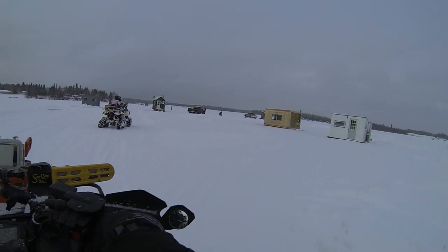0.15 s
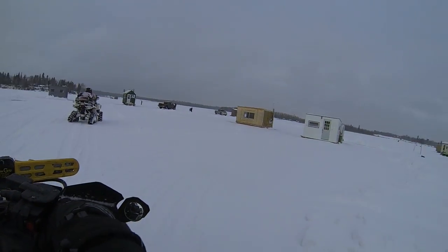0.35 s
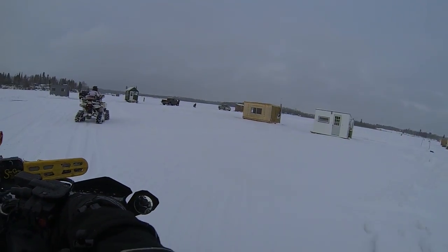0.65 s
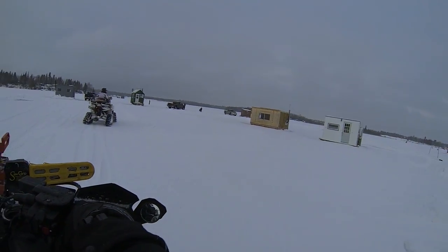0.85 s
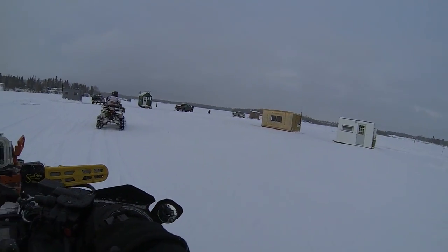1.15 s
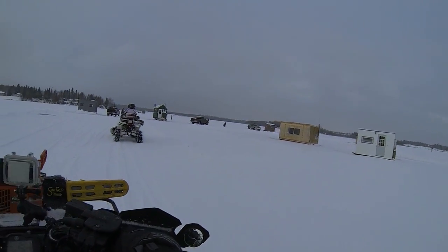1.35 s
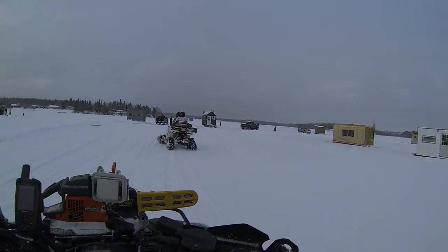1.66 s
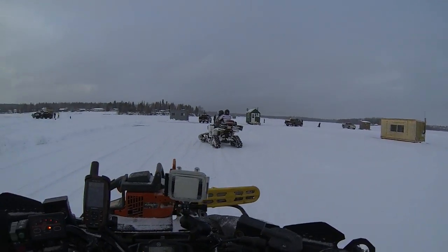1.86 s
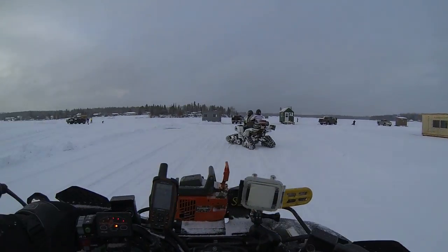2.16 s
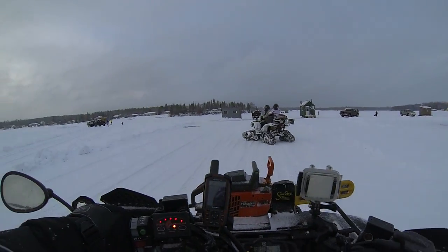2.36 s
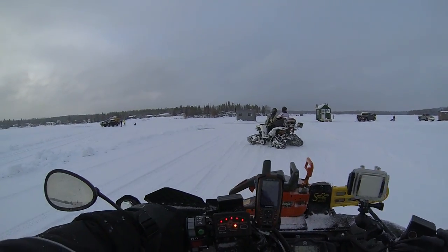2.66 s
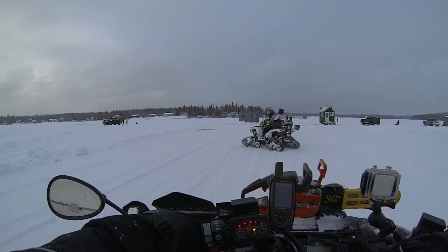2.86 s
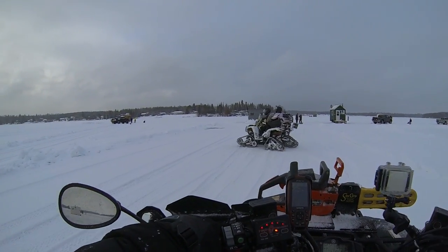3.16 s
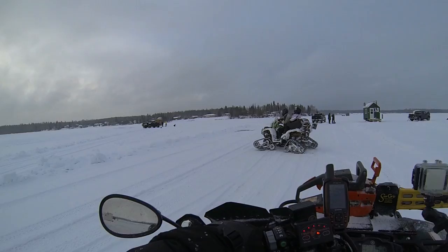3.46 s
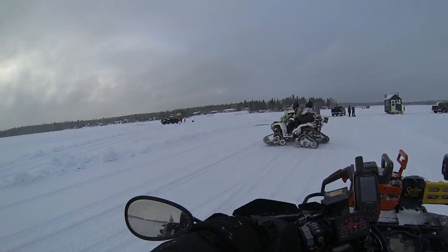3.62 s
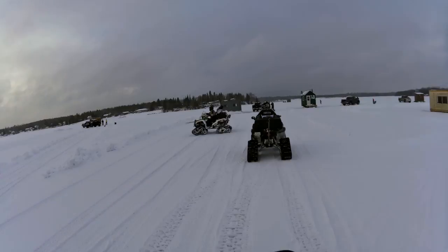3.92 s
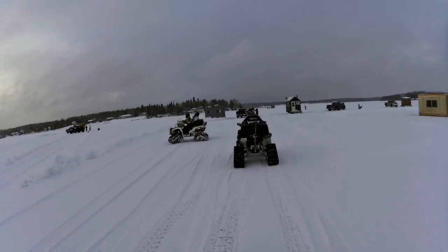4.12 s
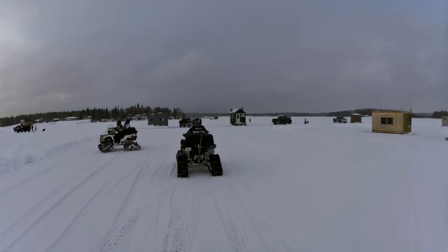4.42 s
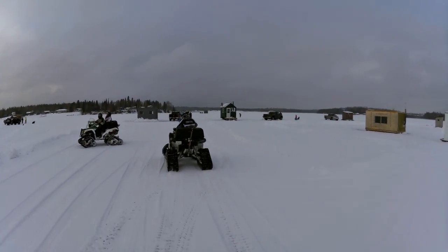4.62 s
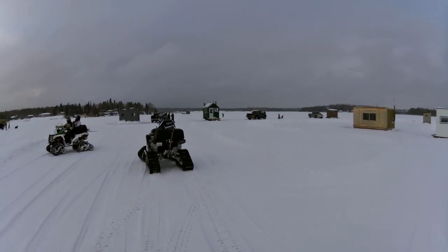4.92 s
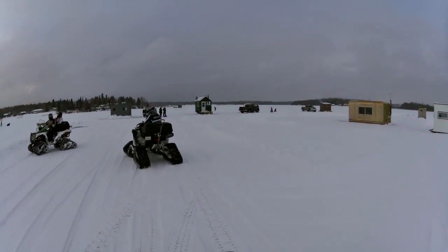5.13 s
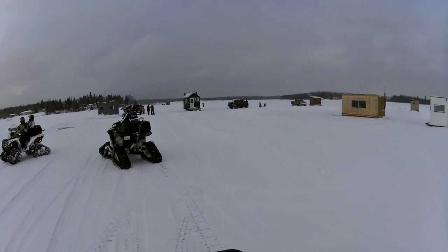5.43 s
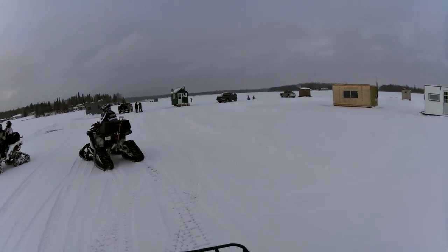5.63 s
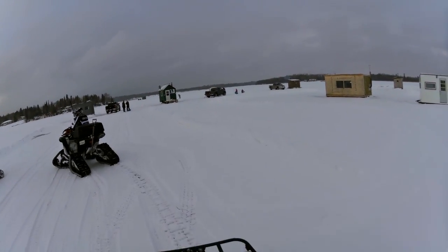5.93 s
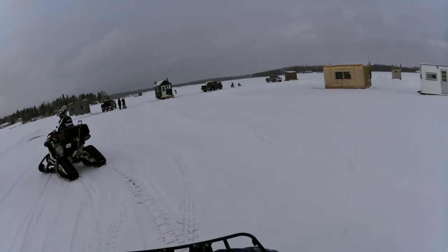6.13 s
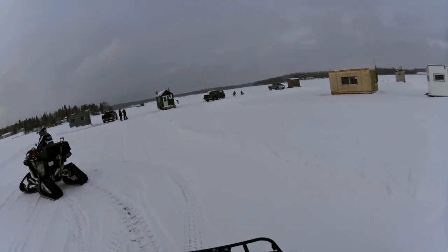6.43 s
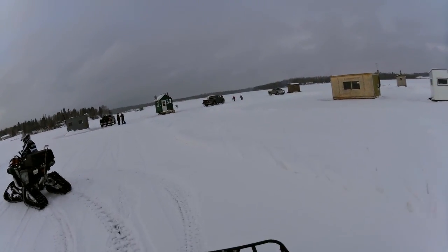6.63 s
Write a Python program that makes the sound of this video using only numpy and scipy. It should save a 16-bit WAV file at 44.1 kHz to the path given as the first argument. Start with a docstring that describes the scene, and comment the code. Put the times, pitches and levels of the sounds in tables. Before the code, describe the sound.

Two twin-cylinder engines outdoors on a snowy lake, heard from one rider's machine. The near one pulls hard, eases off, cruises with rapping knocks and a thin singing gear, then falls lower. The other grows from faint to equal strength, its pitch rising at the end with a limping tick. Steady rumble, clatter and snow crunch, small squeaks and loose clicks; muffled microphones inside a closed housing.

```python
"""Two droning engines at slightly different speeds beat against each other: summed harmonics of each crank cycle.
We ride a tracked all-terrain vehicle over a snowy lake, behind a second machine that draws near as its level rises.
Valves clatter and tracks rumble and crunch over the snow as shaped noise; drive gears whine as sine tones.
Knocks, ticks and clicks are short blows on damped resonances; squeaks are gliding sines.
The microphones sit in a closed camera housing with a port on each side, and add hiss."""
import sys
import numpy as np
from scipy.fft import rfft, irfft, next_fast_len
from scipy.io import wavfile
from scipy.ndimage import map_coordinates

SR = 44100
rng = np.random.default_rng(int(sys.argv[2]) if len(sys.argv) > 2 else 0)


def unload_audio(sound):
    """Save the sound as a 16-bit wav file, at the path given as the first command line argument."""
    columns = np.transpose(np.atleast_2d(sound))
    # keep every value between -1 and 1, then stretch to whole-number steps
    steps = np.round(np.clip(columns, -1, 1) * 32767)
    wavfile.write(sys.argv[1], SR, steps.astype(np.int16))


N = 299026


def amp(db):
    """Decibels to gain."""
    return 10 ** (np.asarray(db) / 20)


def unit(x):
    """Scale to rms 1."""
    return x / np.sqrt(np.mean(x ** 2) + 1e-20)


def curves(rows):
    """One value per sample for each column after the time in seconds."""
    s, *columns = np.transpose(rows)
    return [np.interp(np.arange(N) / SR, s, column) for column in columns]


def wobble(rate):
    """A smooth random curve, rate knots a second."""
    coarse = np.arange(0, N + 64, 64)
    knots = rng.standard_normal(int(N * rate / SR) + 4)
    values = map_coordinates(knots, [coarse * rate / SR], mode="nearest")
    return np.interp(np.arange(N), coarse, values)


def filtered(x, response):
    """x passed through a complex response, a function of frequency in Hz."""
    m = next_fast_len(N + 8192)
    return irfft(rfft(x, m) * response(np.fft.rfftfreq(m, 1 / SR)), m)[..., :N]


def coloured(x, spectrum):
    """x shaped by (Hz, relative dB) points, at rms 1."""
    points_hz, db = np.transpose(spectrum)
    return unit(filtered(x, lambda hz: amp(np.interp(np.log(hz + 1), np.log(points_hz), db))))


def turns(speed, unsteady):
    """Cycles done so far by a source that runs a little unevenly."""
    return np.cumsum(speed * (1 + unsteady * wobble(20))) / SR


def order_tone(cycle, k, scatter, waver_db):
    """Harmonic k of a twin's pulses: odd ones lag a quarter turn, the pipe smears the phase, the level wavers."""
    phase = 2 * np.pi * k * cycle - np.pi / 2 * (k % 2) + scatter * rng.standard_normal()
    return np.sqrt(2) * amp(waver_db * wobble(5)) * np.sin(phase)


def at_throttle(table, k, throttle):
    """The dB of harmonic k, between its coasting, cruising and pulling levels."""
    orders, *states = np.transpose(table)
    return np.interp(throttle, np.arange(len(states)), [np.interp(k, orders, s) for s in states])


def resonance_db(hz, centre_hz, half_width_hz, peak_db):
    """The gain in dB of a tone that passes a resonance."""
    return peak_db / (1 + ((hz - centre_hz) / half_width_hz) ** 2)


def bursts(cycle, decay):
    """An envelope that jumps once a cycle and dies away; decay in cycles."""
    return unit(np.exp(-(cycle % 1) / max(decay, .02)))


def twin_bursts(cycle, places, second, decay):
    """The bursts of both cylinders, the second one weaker."""
    return unit(bursts(cycle - places[0], decay) + second * bursts(cycle - places[1], decay))


def grains(rate, spread_db):
    """Random tiny impacts of uneven size, rate a second on average, at rms 1."""
    hits = rng.random(N) < rate / SR
    return unit(hits * rng.standard_normal(N) * amp(spread_db * rng.standard_normal(N)))


def beats(cycle, place, level_db, scatter_db, jitter_ms):
    """One (seconds, dB) blow per cycle, a little uneven in time and strength."""
    at = np.searchsorted(cycle, np.arange(1, int(cycle[-1]) - 1) + place)
    late, strong = rng.standard_normal((len(at), 2)).T
    return list(zip(at / SR + jitter_ms / 1000 * late, level_db[at] + scatter_db * strong))


def struck(events, modes, gain_db):
    """Short blows ring a part's damped resonances; the housing shuts out their treble."""
    blows = np.zeros(N)
    for s, db in events:
        blows[round(s * SR)] = amp(db + gain_db)

    def ring(hz):
        total = 0
        for i, (centre, width, db) in enumerate(modes):
            damping = 1j * hz * width
            # neighbouring modes ring with opposite sign
            total = total + (-1) ** i * amp(db) * damping / (centre ** 2 - hz ** 2 + damping)
        return total

    return filtered(blows, lambda hz: ring(hz) / (1 + (hz / 2850) ** 20))


# Engine covers close by, ringing as a harmonic passes. Each row: centre in Hz, half width in Hz, gain in dB.
COVER = [(970, 14, 7), (1083, 15, 5.5), (1424, 12, 5)]


def cover_db(hz):
    """What the engine covers' resonances add to a tone, in dB."""
    return sum(resonance_db(hz, *mode) for mode in COVER)


# Own exhaust, before boom and flutter. Each row: multiple of the cycle rate, then coasting, cruising
# and pulling levels in dB.
OWN_ORDERS = [(4, -61, -57, -58), (5, -57, -56.5, -63), (6, -53.5, -52.5, -50), (7, -52, -62.5, -50),
              (8, -47, -49.5, -46), (9, -52, -52.5, -50.5), (10, -53.5, -53.5, -44), (11, -54, -52, -57),
              (12, -54, -51, -66), (13, -52.5, -49, -40.5), (14, -59, -48, -43), (15, -59.5, -41, -48),
              (16, -51, -54, -45.5), (17, -62, -53, -47), (18, -56, -49.5, -49), (19, -60, -57.5, -63),
              (20, -52, -53, -53)]
# Own valve gear, before covers and flutter. Each row: multiple of the cycle rate, then coasting, cruising
# and pulling levels in dB.
VALVE_ORDERS = [(20.9, -59.5, -54, -61), (22, -60, -57.5, -58), (23, -62, -67, -61), (24, -61, -58, -65),
                (27, -66, -62, -70), (27.9, -65, -55.5, -64), (30, -65, -56, -56), (32, -57, -56.5, -58),
                (33, -66, -56.5, -63), (34, -59.5, -54.5, -64), (35.1, -61, -56, -67), (36, -67, -69, -68),
                (37, -61, -61.5, -69), (38, -58, -57, -66), (39.2, -65, -66, -68)]
# Boom of the own exhaust pipe. Each row: time in seconds, gain at the pipe's resonance in dB.
BOOM = [(0, 2), (.56, 6.5), (.8, 2), (2, 0.5), (2.4, -2.5), (3.1, -1.5), (4.9, 4), (5.3, -3), (6.78, -23)]
PIPE_HZ, PIPE_HALF_WIDTH_HZ = 243, 20


def own_engine(cycle, speed, throttle):
    """The throttle shifts the balance of the harmonics; the pipe and covers lift some, and the sum flutters."""
    boom_db = curves(BOOM)[0]
    pulse = cycle - .1
    drone = np.zeros(N)
    for k in range(4, 21):
        # flat-topped resonance
        boom = boom_db / (1 + ((k * speed - PIPE_HZ) / PIPE_HALF_WIDTH_HZ) ** 4)
        level_db = at_throttle(OWN_ORDERS, k, throttle) + boom
        drone += amp(level_db) * order_tone(pulse, k, scatter=1.0, waver_db=1.4)
    for k in range(21, 40):
        level_db = at_throttle(VALVE_ORDERS, k, throttle) + cover_db(k * speed)
        drone += amp(level_db) * order_tone(pulse, k, scatter=1.75, waver_db=2.0)
    return drone * amp(1.03 * wobble(45))


# The other engine, before boom, rasp and distance. Each row: multiple of the cycle rate, level in dB.
OTHER_ORDERS = [(4, -57), (5, -51), (6, -50.5), (7, -50.5), (8, -74), (9, -69), (10, -58.5), (11, -54.5),
                (12, -59.5), (13, -58.5), (14, -57), (15, -58), (16, -58.5), (17, -50), (18, -56.5),
                (19, -61.5), (20, -53.5), (21, -55.5), (22, -57), (23, -55), (24, -63), (25, -56.5),
                (26, -57.5), (27, -60.5), (30, -58), (32, -60), (34, -65)]
# The other exhaust's resonances. Each row: centre in Hz, half width in Hz, gain in dB.
MUFFLER = [(211.3, 15.6, 10), (589, 12.5, 3.5), (689.5, 19, 6.5)]
# upper harmonics: base gain in dB, and extra dB for each dB of the machine's level
OTHER_RASP_DB, RASP_GROWS = -0.5, 0.74
# where the two cylinders of this unevenly firing V-twin puff, in parts of a cycle
OTHER_PUFF_AT = (.1, .5)


def other_engine(cycle, speed, level_db):
    """Harmonics boom as they pass the muffler's resonances; the rasp grows as the machine nears."""
    orders, levels = np.transpose(OTHER_ORDERS)
    rasp_db = OTHER_RASP_DB + RASP_GROWS * level_db
    pulse = cycle - OTHER_PUFF_AT[0]
    drone = np.zeros(N)
    for k in range(4, 35):
        boom = sum(resonance_db(k * speed, *mode) for mode in MUFFLER)
        upper = np.clip((k - 8) / 6, 0, 1)
        order_db = np.interp(k, orders, levels) + boom + upper * rasp_db
        drone += amp(order_db) * order_tone(pulse, k, scatter=1.14, waver_db=1.5)
    return drone * amp(level_db - 0.5 + 0.7 * wobble(45))


# Gas noise at both exhausts. Each row: time in seconds, own level in dB, other level in dB.
PUFFS = [(0, -47, -60), (.45, -44, -60), (.5, -49, -60), (1.35, -49.5, -58), (2.4, -52, -64),
         (3.7, -55, -50), (4, -51, -57), (4.3, -48, -59), (4.9, -51, -44), (5.3, -56, -41.5),
         (5.55, -58, -48), (6, -60, -52), (6.78, -56, -47)]
# Colour of the own puffs. Each row: frequency in Hz, relative density in dB per Hz.
OWN_PUFF = [(200, -14), (380, -7.5), (520, -9.5), (800, -23), (2500, -59)]
# Colour of the other machine's puffs. Each row: frequency in Hz, relative density in dB per Hz.
OTHER_PUFF = [(200, -22), (350, -1.5), (550, 1), (720, -4.5), (1000, -17), (2500, -59)]
PUFF_AT = (.03, .53)  # where the own cylinders puff, in parts of a cycle


def exhaust_puffs(cycle, other_cycle):
    """Every firing blows a puff of gas noise through its muffler."""
    own_db, other_db = curves(PUFFS)
    own = twin_bursts(cycle, PUFF_AT, second=0.51, decay=0.3) * rng.standard_normal(N)
    other = twin_bursts(other_cycle, OTHER_PUFF_AT, second=0.64, decay=0.14) * rng.standard_normal(N)
    return amp(own_db) * coloured(own, OWN_PUFF) + amp(other_db) * coloured(other, OTHER_PUFF)


# Combustion knock under the seat. Each row: time in seconds, nominal peak in dB.
HEAD = [(0, -46), (.6, -49), (1.7, -42), (2.4, -38.5), (2.95, -36), (3.4, -40), (4.15, -40), (4.7, -36),
        (5.2, -54), (6.78, -53)]
# Firings that knock harder than the rest. Each row: time in seconds, nominal peak in dB.
KNOCKS = [(2.833, -32), (2.867, -30), (2.901, -30), (2.935, -28), (2.969, -27.5), (3.037, -30),
          (3.071, -31), (3.207, -29), (3.241, -31), (3.645, -31), (3.713, -30), (3.815, -31), (3.983, -30),
          (4.017, -31), (4.118, -30), (4.151, -26.5)]
# The cylinder head's resonances. Each row: centre in Hz, width in Hz, relative level in dB.
HEAD_RING = [(470, 170, -8), (900, 170, 1.5), (1060, 180, -0.5)]
KNOCK_AT = (.045, .59)  # first and second cylinder, in parts of a cycle
SECOND_KNOCK_DB = -4.5  # the second cylinder against the first


def combustion_knock(cycle):
    """Each firing of the own engine raps the cylinder head, which rings; some rap much harder."""
    level_db = curves(HEAD)[0]
    first = []
    for s, db in beats(cycle, KNOCK_AT[0], level_db, scatter_db=1.5, jitter_ms=.07):
        # a listed hard knock within 12 ms sets the strength
        hard = [hard_db for at, hard_db in KNOCKS if abs(at - s) < .012]
        first.append((s, hard[0] if hard else db))
    second = beats(cycle, KNOCK_AT[1], level_db + SECOND_KNOCK_DB, scatter_db=2.5, jitter_ms=.1)
    return struck(first + second, HEAD_RING, gain_db=39.5)


# The other engine's valve gear. Each row: time in seconds, first and second cylinder's nominal peaks in dB.
TICKS = [(0, -58, -58), (2.1, -52, -54), (2.25, -43, -50), (2.55, -42, -43), (3.1, -44, -47),
         (3.55, -42, -43), (4.05, -45, -45), (4.45, -42, -41), (4.85, -45, -40), (5.25, -41.5, -44),
         (5.7, -43, -45), (6.1, -41, -41), (6.45, -35, -40), (6.78, -34, -38)]
# Resonances of ticks and clicks. Each row: centre in Hz, width in Hz, relative level in dB.
FITTING = [(1750, 220, 0), (1950, 230, 0), (2430, 130, -17), (2900, 400, -24)]
TICK_AT = (.755, .18)  # first and second cylinder, in parts of a cycle


def valve_ticks(other_cycle):
    """The other engine's valve gear ticks in a limping two-beat of struck resonances."""
    ticks = []
    for place, level_db in zip(TICK_AT, curves(TICKS)):
        ticks += beats(other_cycle, place, level_db, scatter_db=1.5, jitter_ms=.3)
    return struck(ticks, FITTING, gain_db=36)


# Drive gear, following the ground speed. Each row: time in seconds, tooth mesh rate in Hz.
GEAR = [(0, 744), (.25, 738), (.5, 724), (.72, 677), (1.2, 649), (1.35, 633), (1.6, 626), (2.1, 626),
        (2.62, 611), (2.75, 626), (3.2, 625), (3.75, 627), (4.1, 631), (4.4, 629), (4.92, 634), (5.18, 623),
        (5.6, 606), (6.25, 537), (6.78, 525)]
# Spells in which the gear sings. Each row: start in seconds, end in seconds, multiple of the mesh tone,
# level in dB before shake and waver.
SINGING = [(0, .2, 2, -49), (.22, .5, 1, -51), (.69, 1.05, 1, -47), (1.03, 1.27, 1, -43.5),
           (1.3, 1.6, 2, -51), (1.9, 2.13, 2, -43), (2.55, 2.7, 1, -48), (2.65, 3.05, 2, -51),
           (3.15, 5.12, 2, -43), (5.72, 5.92, 2, -49), (6.02, 6.15, 2, -49)]
# Timing gears, before resonances. Each row: teeth a cycle, then coasting, cruising and pulling levels in dB.
TIMING = [(40.5, -61, -56.5, -50), (47, -68, -68, -58), (47.9, -62, -59, -51)]
MESH_DB, MESH_DB_PER_THROTTLE = -55, 2  # the mesh tone with the throttle shut, and its gain with load
SING_FADE_S, SING_REST_DB = 0.042, -55.5  # rise and fall of a spell; the octave's level between spells


def singing(multiple, rest_db):
    """The gain of one gear partial: its resting level, raised by its spells."""
    t, gain = np.arange(N) / SR, amp(rest_db)
    for start, end, k, db in SINGING:
        if k == multiple:
            fade = np.clip(.5 + np.minimum(t - start, end - t) / SING_FADE_S, 0, 1)
            gain = np.maximum(gain, amp(db) * fade)
    return gain


def whines(cycle, speed, throttle):
    """Drive gears sing with the ground speed, shaken by the firings; the timing gears follow the crank."""
    mesh = turns(curves(GEAR)[0], unsteady=0.003005)
    shake = 1 + 0.067 * np.cos(4 * np.pi * cycle) + 0.47 * np.cos(2 * np.pi * cycle)
    mesh_gain = singing(1, MESH_DB + MESH_DB_PER_THROTTLE * throttle) * amp(1.1 * wobble(19))
    octave_gain = singing(2, SING_REST_DB) * amp(1.8 * wobble(30))
    drive = mesh_gain * np.sin(2 * np.pi * mesh) + octave_gain * np.sin(4 * np.pi * mesh)
    timing = np.zeros(N)
    for teeth in (40, 47, 48):
        tooth_hz = teeth * speed
        level_db = at_throttle(TIMING, teeth, throttle) + cover_db(tooth_hz)
        # the timing gears' own cover rings too
        level_db = level_db + resonance_db(tooth_hz, centre_hz=1045, half_width_hz=48, peak_db=10)
        timing += amp(level_db) * order_tone(cycle, teeth, scatter=1.53, waver_db=2.2)
    return np.sqrt(2) * shake * drive + timing


# Snow under the tracks, before flutter. Each row: time in seconds, crunch level in dB, spray level in dB.
SNOW = [(0, -56, -53.5), (.7, -59, -59), (1.4, -52, -57), (2, -50.5, -53.5), (2.4, -48.5, -55.5),
        (3.4, -50.5, -53), (4.3, -46.5, -58), (5.15, -51, -64), (5.9, -47.5, -55.5), (6.78, -43.5, -49.5)]
# Track rumble. Each row: frequency in Hz, relative density in dB per Hz.
RUMBLE = [(15, -5.5), (55, -6.5), (90, -8.5), (140, -12.5), (200, -5.5), (280, -7.5), (400, -3.5),
          (600, -3.5), (800, -8), (1200, -20), (3000, -51)]
# Valve clatter. Each row: frequency in Hz, relative density in dB per Hz.
CLATTER = [(300, -31), (600, -15), (800, -9), (1000, -1.5), (1170, -5.5), (1330, -5), (1450, -2),
           (1580, -9.5), (1750, -11.5), (2400, -27.5), (3400, -31), (5000, -79)]
# Crunching snow. Each row: frequency in Hz, relative density in dB per Hz.
CRUNCH = [(700, -27), (1400, -3.5), (1700, 1), (2000, -2), (2250, -10), (2450, -16), (3000, -20),
          (4000, -62)]
# Snow spray. Each row: frequency in Hz, relative density in dB per Hz.
SPRAY = [(1500, -32), (2100, 2.5), (2300, 1), (2430, 5.5), (2600, 0), (2900, 0), (3200, -4), (3450, -2),
         (3750, -33), (5000, -60)]
RUMBLE_DB, OTHER_RUMBLE_DB = -44, -55  # own tracks; the other machine's, scaled by its level
# own valves and their gain with load; the other machine's, scaled by its level
CLATTER_DB, CLATTER_DB_PER_THROTTLE, OTHER_CLATTER_DB = -45, 1.5, -46.5


def running_gear(cycle, other_cycle, throttle, other_db):
    """Tracks rumble, valves clatter with the firings, and the other engine rasps over cleats that crush snow."""
    crunch_db, spray_db = curves(SNOW)
    rumble_gain = np.hypot(amp(RUMBLE_DB), amp(OTHER_RUMBLE_DB + other_db))
    clatter_db = CLATTER_DB + CLATTER_DB_PER_THROTTLE * throttle
    clatter_gain = np.hypot(amp(clatter_db), amp(OTHER_CLATTER_DB + other_db))
    firing = unit(1 + .5 * twin_bursts(cycle, PUFF_AT, second=0.83, decay=0.37))
    # the nearer the other machine, the more its beat shows in the rasp
    rasp = unit(1 + .45 * amp(other_db) * twin_bursts(other_cycle, TICK_AT, second=.8, decay=.08))
    rumble = coloured(firing * grains(rate=5000, spread_db=1.5), RUMBLE)
    rumble *= rumble_gain * amp(0.5 * wobble(8.8))
    clatter = coloured(firing * grains(rate=7000, spread_db=1.5), CLATTER)
    clatter *= clatter_gain * amp(0.75 * wobble(35))
    crunch = coloured(rasp * grains(rate=12000, spread_db=2.5), CRUNCH)
    crunch *= amp(crunch_db + 1.36 * wobble(35))
    spray = coloured(rasp * grains(rate=11000, spread_db=1.0), SPRAY)
    spray *= amp(spray_db + 1.5 * wobble(35))
    return rumble + clatter + crunch + spray


def housing_rustle():
    """A faint, mostly low noise in the housing, unrelated between the two ports."""
    # each row: frequency in Hz, relative density in dB per Hz
    spectrum = [(20, -2.5), (60, 10.5), (150, 0.5), (1000, -8.0), (2000, -8.5), (3200, -18.5), (5000, -39.0)]
    return amp(-50) * coloured(rng.standard_normal((2, N)), spectrum)


# Barks of the own exhaust. Each row: time in seconds, nominal peak in dB.
BARKS = [(.034, -27), (.11, -29), (.162, -29), (.322, -28), (.356, -31), (.388, -31), (.422, -29),
         (.451, -27.5)]
# The bark's resonance. Each row: centre in Hz, width in Hz, relative level in dB.
BARK_RING = [(460, 110, 0)]


def exhaust_barks():
    """The own exhaust barks under full throttle: short blows on one damped resonance."""
    return struck(BARKS, BARK_RING, gain_db=35)


# Squeaks of the tracks. Each row: start in seconds, length in seconds, start in Hz, end in Hz,
# rms level at the middle in dB.
SQUEAKS = [(1.25, .17, 562, 558, -46), (5.55, .25, 1635, 1662, -50), (6.42, .24, 1424, 1428, -48)]


def squeaks():
    """Rubber slips on an idler wheel: a short, slightly unsteady tone that swells and fades."""
    t, out = np.arange(N) / SR, np.zeros(N)
    for start, length, from_hz, to_hz, db in SQUEAKS:
        progress = np.clip((t - start) / length, 0, 1)
        glide = turns(from_hz + (to_hz - from_hz) * progress, unsteady=0.00307)
        swell = amp(db) * np.sin(np.pi * progress)
        out += swell * np.sqrt(2) * np.sin(2 * np.pi * glide)
    return out


# Further ticks of the other engine's valve gear, struck harder. Each row: time in seconds, nominal peak in dB.
HARD_TICKS = [(2.718, -37), (3.682, -34), (4.164, -37), (4.286, -34), (4.3, -35), (4.317, -30), (4.331, -36),
              (4.41, -37), (5.472, -36), (5.613, -37), (5.675, -38), (5.799, -34), (6.052, -35)]


def hard_ticks():
    """Some ticks of the other engine's valve gear come harder: single blows on the same resonances as the
    regular ticks."""
    return struck(HARD_TICKS, FITTING, gain_db=39.5)


def ports(x, lag_ms):
    """Sound through the housing reaches the left port a moment after the right."""
    sides = np.array([[-1], [1]])  # left late by half the lag, right early by half
    return filtered(x, lambda hz: np.exp(1j * np.pi * hz * lag_ms / 1000 * sides))


# Own engine. Each row: time in seconds, four-stroke cycles a second.
OWN_SPEED = [(0, 31.5), (.4, 30.85), (.8, 28.5), (1.65, 27.7), (1.8, 28.1), (2, 29), (2.35, 28.45),
             (3.15, 29.6), (4.1, 29.68), (5, 29.55), (5.2, 29), (5.6, 27.3), (5.8, 26.3), (6.1, 25.3),
             (6.4, 24.85), (6.78, 25.05)]
# The other engine. Each row: time in seconds, four-stroke cycles a second.
OTHER_SPEED = [(0, 33.4), (1, 29.9), (2, 31.5), (2.2, 32.4), (2.6, 33.15), (3.1, 33.29), (3.5, 33.15),
               (4, 33.15), (4.3, 32.8), (4.6, 32), (5.2, 31.05), (5.55, 31.4), (5.8, 32.8), (6, 33.87),
               (6.2, 34.7), (6.78, 35.45)]
# Own throttle. Each row: time in seconds, opening (0 coasting, 1 cruising, 2 pulling).
THROTTLE = [(0, 2.04), (.46, 1.52), (.5, 0.27), (1.6, 0.1), (2, 0.72), (2.4, 0.61), (3.0, 0.95),
            (4.9, 1.05), (5.7, 0.3), (6.2, 0.56), (6.78, 0.74)]
# The other machine drawing near. Each row: time in seconds, relative level in dB.
OTHER = [(0, -22), (1, -19), (1.5, -11), (2.6, -2), (4.6, 0), (5.6, 3), (6, 2), (6.78, 0.5)]


def scene():
    """Both machines, heard through the housing's two ports, with the rustle added at each."""
    speed, other_speed, throttle, other_db = (curves(c)[0] for c in (OWN_SPEED, OTHER_SPEED, THROTTLE, OTHER))
    cycle = turns(speed, unsteady=.0005)
    other_cycle = turns(other_speed, unsteady=.0007)
    engines = own_engine(cycle, speed, throttle) + other_engine(other_cycle, other_speed, other_db)
    engines += exhaust_puffs(cycle, other_cycle) + combustion_knock(cycle) + valve_ticks(other_cycle)
    gear = whines(cycle, speed, throttle) + running_gear(cycle, other_cycle, throttle, other_db)
    rustle = housing_rustle()
    brief = exhaust_barks() + squeaks() + hard_ticks()
    return ports(engines + gear + brief, lag_ms=0.13) + rustle


# Microphone hiss. Each row: frequency in Hz, relative density in dB per Hz.
HISS = [(200, -15), (4000, 0), (4800, 4), (5100, 10), (5400, 2.5), (8000, 0), (9500, 1.5), (10100, 4),
        (11000, 1), (12500, 2.5), (12900, -11), (15000, -17)]
# Constant offset. Each row, left then right: share of full scale.
OFFSET = [
    [.261],
    [.077],
]
TOP_HZ = 15100  # band limit


def record(dry):
    """The camera adds hiss, stronger on the left, and a constant offset, and cuts all above its band limit."""
    shared = rng.standard_normal(N)
    separate = rng.standard_normal((2, N))
    hiss = coloured(shared + 1.1 * separate, HISS) * amp([[-69.5], [-72.5]])
    return filtered(dry + hiss, lambda hz: hz < TOP_HZ) + OFFSET


dry = scene()
out = record(dry)
unload_audio(out)
```